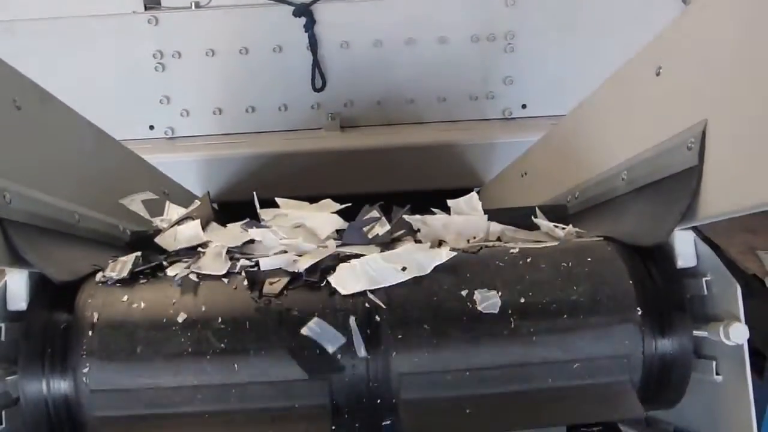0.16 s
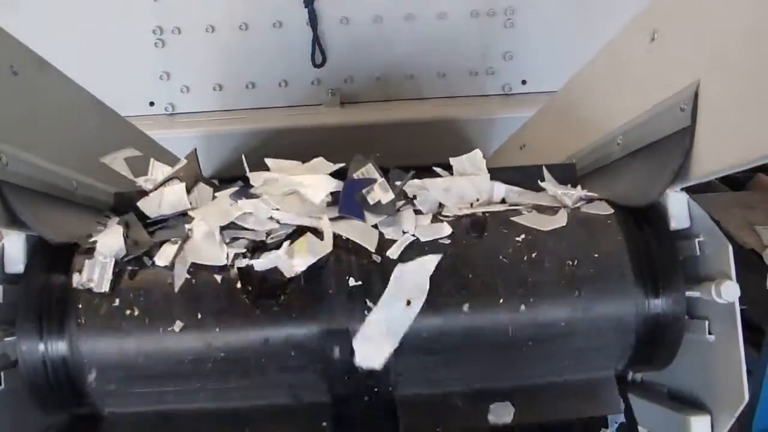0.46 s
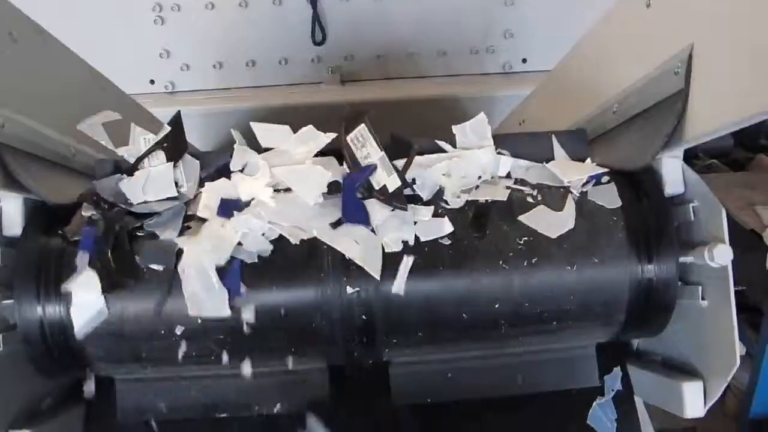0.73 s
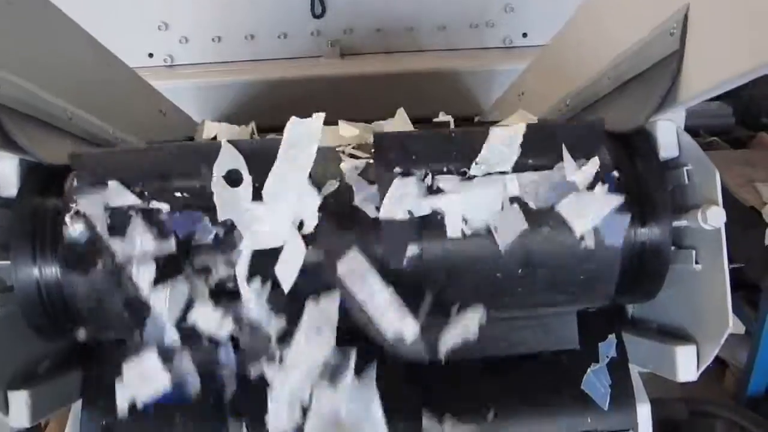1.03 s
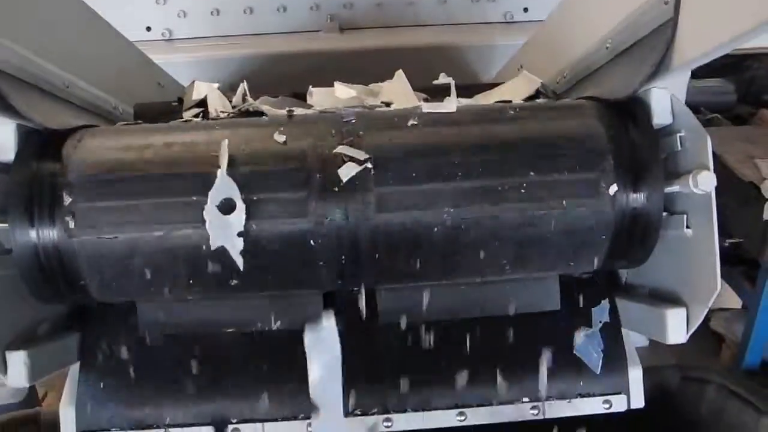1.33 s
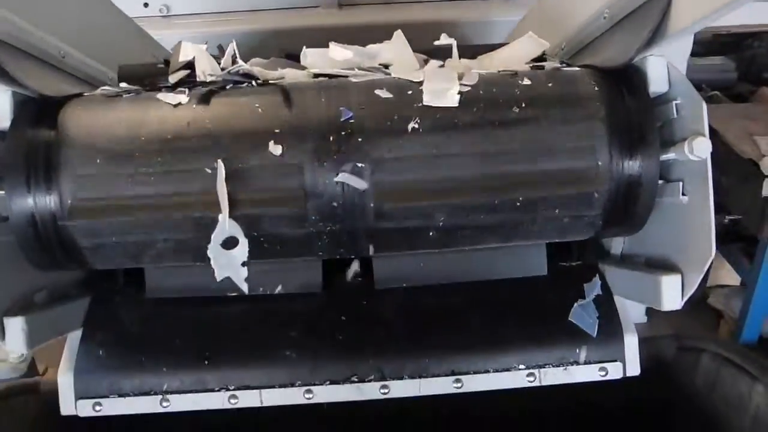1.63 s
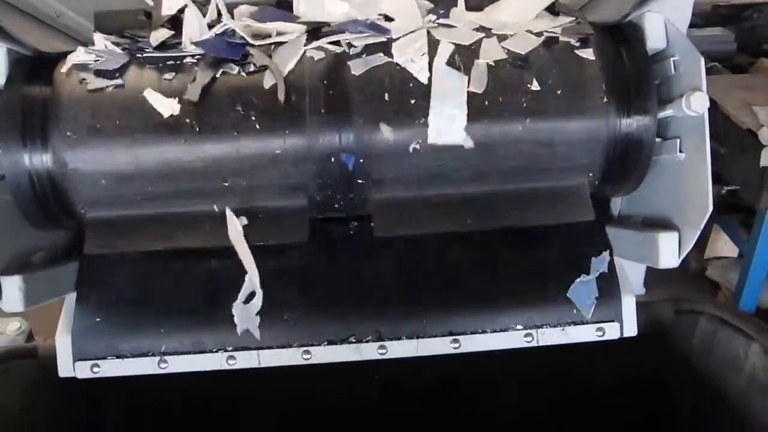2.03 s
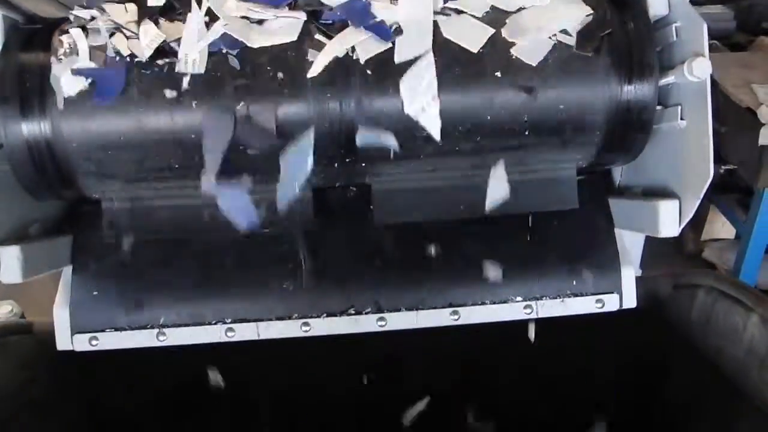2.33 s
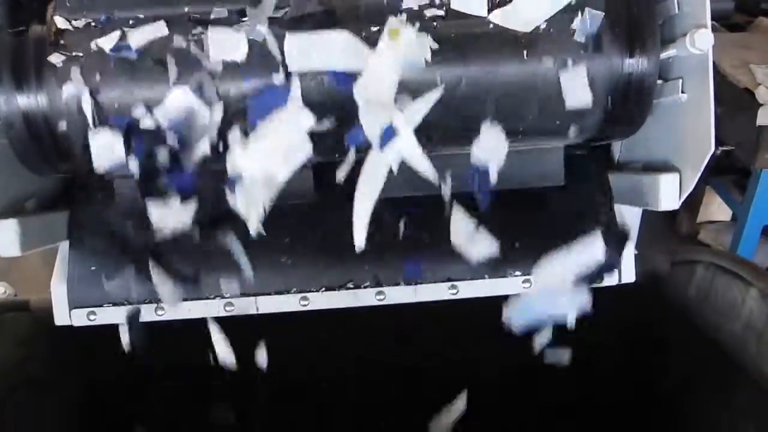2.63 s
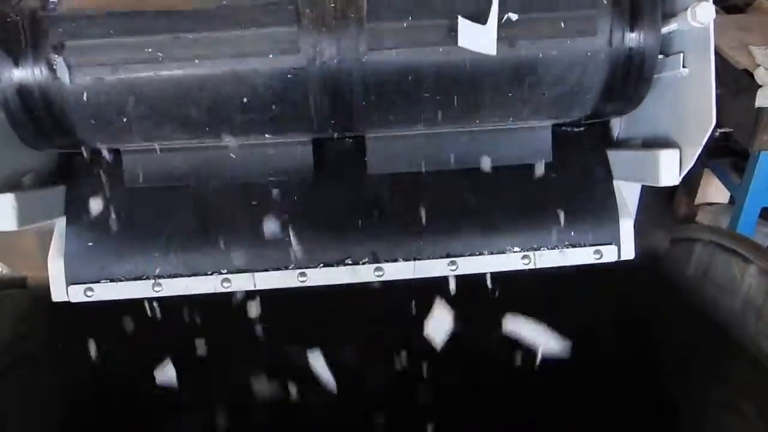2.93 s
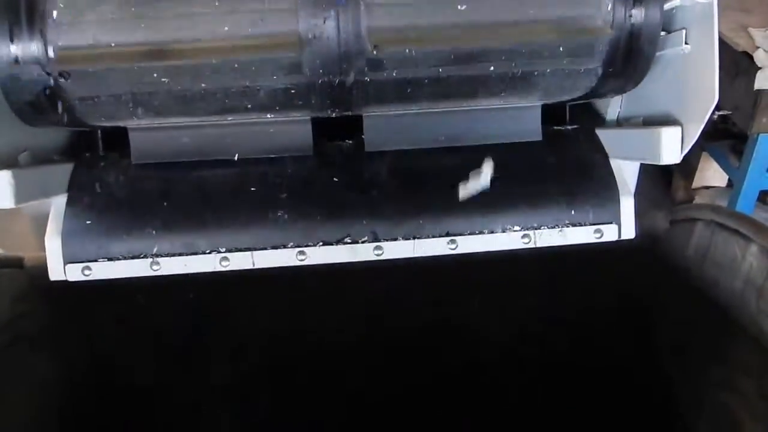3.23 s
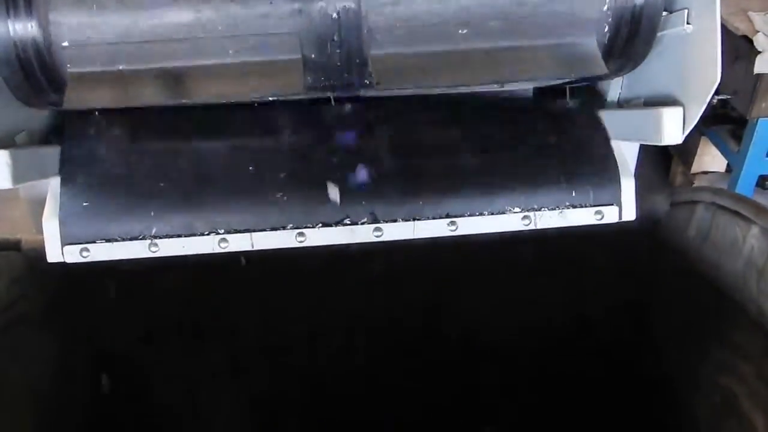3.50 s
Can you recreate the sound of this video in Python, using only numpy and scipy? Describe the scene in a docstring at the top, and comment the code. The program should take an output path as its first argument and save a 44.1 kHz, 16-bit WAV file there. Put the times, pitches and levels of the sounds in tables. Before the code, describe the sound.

Industrial shredder grinds hard plastic in a loud, dense, crackling rattle over a steady machine rumble

```python
"""In the steel hopper of an industrial shredder, hard plastic is ground: shards crack and rattle. Grinding and
ticks are dense random short rings, shaped by spectra and level curves; splinters and knocks (thick pieces and
the struck hopper panel) are bursts of tiny cracks, squeaks are noise in a sharp resonance. Sine lines and
filtered noise make the drive hum, rumble and slowly swell. One microphone with four notches hears it all."""
import sys
import numpy as np
from scipy import signal
from scipy.fft import rfft, irfft, next_fast_len
from scipy.io import wavfile
from scipy.ndimage import map_coordinates

SR = 44100
rng = np.random.default_rng(int(sys.argv[2]) if len(sys.argv) > 2 else 0)


def int16_out(signal):
    """Quantize to a 16-bit WAV file."""
    q = np.round(np.clip(np.atleast_2d(signal).T, -1, 1) * 32767)
    wavfile.write(sys.argv[1], SR, q.astype(np.int16))


N = 161406  # samples

# Level curves before trim, coarse pieces, small shards, finest chips: (time [s], level [dB])
COARSE_LEVEL = [(0, -28), (.1, -23.5), (.25, -27), (.42, -23.5), (.54, -28.5), (.88, -24), (1.12, -27),
                (1.35, -28), (1.69, -29), (1.79, -24.5), (1.92, -27), (1.99, -23), (2.42, -25.5),
                (2.52, -23.5), (2.68, -24.5), (2.77, -21.5), (2.98, -24.5), (3.15, -28), (3.3, -25),
                (3.5, -28.5), (3.66, -27.5)]
SMALL_LEVEL = [(0, -19.5), (.25, -28), (.3, -22.5), (.53, -26), (.9, -22.5), (1.1, -21.5), (1.34, -23),
               (1.42, -19.5), (1.58, -21.5), (1.71, -23.5), (1.8, -22), (1.92, -25.5), (2.04, -20.5),
               (2.27, -19.7), (2.42, -21.5), (2.52, -20.3), (2.68, -22), (3.0, -21), (3.16, -23),
               (3.26, -23), (3.66, -26)]
FINE_LEVEL = [(0, -47), (.25, -53), (.3, -46.5), (.53, -50.5), (.85, -46), (1.08, -45.5), (1.22, -39.5),
              (1.34, -49), (1.43, -44.5), (1.72, -48.5), (1.8, -45), (1.92, -50.5), (2.04, -40.5),
              (2.19, -37.5), (2.38, -46.5), (2.48, -42), (2.7, -46.5), (2.92, -48), (2.99, -43),
              (3.16, -47), (3.4, -50), (3.58, -47), (3.66, -50.5)]
# Relative spectra of the three sizes: (frequency [Hz], density [dB per Hz])
COARSE_TONE = [(25, -65), (120, -27.5), (300, -22), (550, -8), (690, -4), (900, -3.5), (1400, -2),
               (2000, 3), (2500, 3), (3300, -4), (5000, -3.5), (10000, -34.5)]
SMALL_TONE = [(500, -42), (1500, -15), (2300, -5), (3000, 1), (3600, -2.5), (4500, 1), (5400, -5),
              (6400, -2), (7300, -6), (8800, -12), (10700, -24.5), (13000, -34), (15500, -44)]
FINE_TONE = [(3000, -19), (6500, -4.5), (8800, 8), (10700, -4), (12700, -4.5), (14400, 0.5), (15600, -5)]
COARSE_TRIM_DB, SMALL_TRIM_DB, FINE_TRIM_DB = 3, 1.87, 9
# Relative spectrum of flakes ticking on the chute: (frequency [Hz], density [dB per Hz])
FLAKE_TONE = [(600, -27), (2000, -12), (4300, 6), (6500, -10), (9000, -5), (12000, -20), (15500, -17)]
TICK_TRIM_DB = -14

# Drive lines: (frequency [Hz], rms level at start [dB], rms level at end [dB]), before sway
HUM_LINES = [(91, -65, -65), (189, -61, -66), (300.5, -55.5, -56.5), (398, -63, -52), (668, -51, -49),
             (1992, -51, -46)]
HUM_WANDER_RAD, HUM_SWAY_DB = 0.8, 1.5
# Relative spectrum of running belt and gears: (frequency [Hz], density [dB per Hz])
BELT_GEAR_TONE = [(10, -55), (25, -35), (60, -40), (150, -23), (250, -11), (450, -10), (580, -17),
                  (700, -1), (1000, -8), (3000, 0.5), (12000, -45)]
RUMBLE_DB, RUMBLE_SWAY_DB = -30.5, 1.2
# Slow swells of low rumble from the belt, before trim: (time [s], level [dB])
SWELL_LEVEL = [(0, -62), (0.75, -59), (1.0, -51), (1.3, -55.5), (1.6, -68), (2.3, -57.5), (2.85, -55),
               (3.2, -70), (3.66, -58)]
# Relative spectrum of the swells: (frequency [Hz], density [dB per Hz])
LOW_SWELL_TONE = [(10, -28), (25, -6), (60, -13.5), (105, -5), (160, -8.5), (300, -15), (1000, -47)]
SWELL_TRIM_DB = -1

# Pieces splintering, before echo: (time [s], level [dB], length [s])
SPLINTER_EVENTS = [(.061, -27, 0.0067), (0.285, -26, 0.032), (0.893, -25, 0.022), (0.955, -19.5, 0.018),
                   (1.064, -15.5, 0.011), (1.091, -18.5, 0.011), (1.109, -20, 0.024), (1.276, -17, 0.0054),
                   (1.285, -17, 0.01), (1.381, -15.5, 0.014), (1.404, -23, 0.015), (1.433, -17, 0.0063),
                   (1.434, -19.5, .02), (1.476, -19.5, .016), (1.502, -16, 0.011), (1.542, -20.5, 0.027),
                   (1.574, -13, 0.01), (1.651, -21.5, 0.039), (2.235, -20.5, 0.045), (2.501, -19.5, 0.018),
                   (2.608, -19.5, 0.011), (2.699, -31, 0.011), (2.741, -20, 0.03), (2.887, -21, 0.024),
                   (2.959, -19, 0.03), (2.989, -14.5, 0.015), (3.055, -18.5, .012), (3.089, -22, 0.033),
                   (3.213, -23, 0.034)]
# Relative spectrum of a splinter: (frequency [Hz], density [dB per Hz])
BRITTLE_TONE = [(600, -27), (2000, -10), (3100, 0), (4200, 1), (5400, -1), (6600, 1), (8800, -11),
                (11000, -21), (15500, -26)]
CRACKS_PER_S, CRACK_SPREAD_DB, CRACK_DECAY_S, STRESS_RAMP_S = 2600, 3.5, .0007, .005
# Knocks, before echo: thick pieces crushed on the wall (rings near 1.2 and 2 kHz) and the struck hopper panel
# (rings near 700 Hz): (time [s], level [dB], length [s], ring [Hz])
KNOCK_EVENTS = [(0.077, -22.5, 0.038, 2000), (0.082, -27, 0.019, 1160), (1.719, -32, .04, 1150),
                (1.769, -25.5, 0.067, 1220), (1.966, -24, 0.082, 2000), (1.386, -29, 0.02, 730),
                (1.432, -27, 0.0058, 706), (1.509, -32.5, 0.064, 705), (1.637, -31, 0.0265, 715),
                (1.956, -32, 0.045, 740), (2.585, -30.5, 0.027, 710), (2.967, -24.5, 0.01, 730)]
KNOCK_Q = 5
# Pieces dragged over steel: (time [s], level before fade [dB], length [s], pitch [Hz])
SQUEAK_EVENTS = [(0.904, -36, .06, 4970), (1.067, -47, .16, 11270), (2.206, -18, .06, 2980),
                 (2.291, -23.5, 0.13, 4720), (2.44, -46, .08, 13800), (3.36, -52, .08, 10560),
                 (3.48, -40.5, 0.19, 9340)]
SQUEAK_Q = 130

# Decay of the steel walls: (frequency [Hz], time to fall 60 dB [s])
WALL_T60 = [(300, 0.73), (2000, 0.58), (6000, 0.48), (14000, 0.24)]
GRIND_ECHO_DB, BREAK_ECHO_DB = 0.5, -11
# Microphone notches: (centre [Hz], width [Hz], depth [0-1])
MIC_NOTCHES = [(2695, 640, 0.92), (4967, 490, 1), (5700, 400, 1), (7840, 760, 1)]
TOP_HZ = 15750


def amp(db):
    """Decibels to gain."""
    return 10 ** (np.asarray(db) / 20)


def unit(x):
    """Scale to rms 1."""
    return x / np.sqrt(np.mean(x ** 2) + 1e-20)


def along(points, hz):
    """Interpolate (Hz, value) points on a log frequency axis."""
    point_hz, values = np.transpose(points)
    return np.interp(np.log(hz + 1), np.log(point_hz + 1), values)


def curve(rows):
    """Interpolate (s, value) points, one value per sample."""
    return np.interp(np.arange(N) / SR, *np.transpose(rows))


def wobble(knots_per_s):
    """Smooth random curve through normally distributed knots."""
    position = np.arange(N) * knots_per_s / SR
    return map_coordinates(rng.standard_normal(1024), [position], mode="wrap")


def filtered(x, response):
    """Apply a complex frequency response."""
    m = next_fast_len(N + SR // 2)
    return irfft(rfft(x, m) * response(np.fft.rfftfreq(m, 1 / SR)), m)[:N]


def coloured(x, tone):
    """Minimum-phase filter with the given spectrum, unit energy."""
    size = 4096
    log_gain = np.log(amp(along(tone, np.fft.rfftfreq(size, 1 / SR))))
    cepstrum = irfft(log_gain)
    # fold the cepstrum: causal response
    cepstrum[1:size // 2] *= 2
    cepstrum[size // 2 + 1:] = 0
    h = irfft(np.exp(rfft(cepstrum)))
    return signal.fftconvolve(x, h / np.linalg.norm(h))[:N]


def add(out, start_s, x):
    """Mix x into out at start_s."""
    i = max(0, round(start_s * SR))
    out[i:i + len(x)] += x[:max(0, len(out) - i)]


def shards(low_hz, high_hz, ring_s, spread_db, count, size):
    """Random collisions; each shard is a decaying sine at its own pitch, cut at size samples."""
    when, pitch, life = rng.random((count, 3)).T[:, :, None]
    strength = amp(spread_db * np.clip(rng.standard_normal((count, 1)), -2, 2))
    k = np.arange(size)
    hz = low_hz + (high_hz - low_hz) * pitch
    decay = np.exp(-k / SR / (ring_s * (.5 + life)))
    rings = strength * decay * np.sin(2 * np.pi * hz * k / SR)
    # a lead-in of size samples is dropped, so rings are already under way at 0 s
    index = (when * (N + size)).astype(int) + k
    return np.bincount(index.ravel(), rings.ravel(), N + size)[size:N + size]


def hopper(x, wet_db):
    """Steel walls answer with decaying noise, a new tail per time slice; the end wraps to the start."""
    slices = np.array_split(np.arange(N), 64)
    noise = rng.standard_normal((len(slices), SR // 5))
    hz, t, z = signal.stft(noise, SR, nperseg=256)
    decay = amp(-60 * t / along(WALL_T60, hz)[:, None])
    tails = signal.istft(z * decay, SR, nperseg=256)[1]
    echo = np.zeros(2 * N)
    for part, tail in zip(slices, tails):
        reply = signal.fftconvolve(x[part], tail / np.linalg.norm(tail))
        add(echo, part[0] / SR + .002, reply)
    return x + amp(wet_db) * (echo[:N] + echo[N:])


def fracture(length_s):
    """Tiny random cracks under stress that builds and fades; energy of rms 1 over length_s."""
    t = np.arange(SR // 6) / SR
    chance = rng.random(len(t))
    strength, grit = rng.standard_normal((2, len(t)))
    knots_s = [0, min(STRESS_RAMP_S, length_s / 2), length_s, length_s + STRESS_RAMP_S]
    stress = np.interp(t, knots_s, [.5, 1, 0.34, 0.065])
    cracks = (chance < CRACKS_PER_S / SR) * stress
    cracks = cracks * amp(CRACK_SPREAD_DB * np.clip(strength, -2, 2))
    # power decays twice as fast as amplitude
    power = signal.lfilter([1], [1, -np.exp(-2 / (SR * CRACK_DECAY_S))], cracks ** 2)
    x = grit * np.sqrt(power)
    return x * np.sqrt(length_s * SR / (np.sum(x ** 2) + 1e-20))


def grinding():
    """Three sizes of plastic collide in the hopper; the cutters bite unevenly on all of them."""
    bite_db = .45 * wobble(32) + .4 * wobble(17)
    coarse = shards(150, 6000, ring_s=.0015, spread_db=3.5, count=11000, size=256)
    small = shards(800, 14000, ring_s=.0009, spread_db=4, count=20000, size=160)
    fine = shards(4000, 16000, ring_s=.0004, spread_db=3, count=30000, size=64)
    layers = [(coarse, COARSE_TONE, curve(COARSE_LEVEL) + COARSE_TRIM_DB + bite_db),
              (small, SMALL_TONE, curve(SMALL_LEVEL) + SMALL_TRIM_DB + bite_db),
              (fine, FINE_TONE, curve(FINE_LEVEL) + FINE_TRIM_DB + 2 * bite_db)]
    out = np.zeros(N)
    for x, tone, level_db in layers:
        out += unit(hopper(coloured(x, tone), GRIND_ECHO_DB)) * amp(level_db)
    return out


def ticks():
    """Stray flakes land on the chute near the microphone; level follows the small shards."""
    hits = shards(1500, 7000, ring_s=.00012, spread_db=7, count=190, size=48)
    return unit(coloured(hits, FLAKE_TONE)) * amp(curve(SMALL_LEVEL) + TICK_TRIM_DB)


def drive():
    """Motor and gear lines waver in level and phase over belt rumble and slow swells of low rumble."""
    t = np.arange(N) / SR
    hum = np.zeros(N)
    for hz, first_db, last_db in HUM_LINES:
        level_db = np.linspace(first_db, last_db, N) + HUM_SWAY_DB * wobble(5.86)
        phase = 2 * np.pi * hz * t + HUM_WANDER_RAD * wobble(9.7)
        hum += amp(level_db) * np.sqrt(2) * np.sin(phase)
    rumble = unit(coloured(rng.standard_normal(N), BELT_GEAR_TONE))
    rumble = rumble * amp(RUMBLE_DB + RUMBLE_SWAY_DB * wobble(9.7))
    swell = unit(coloured(rng.standard_normal(N), LOW_SWELL_TONE))
    swell = swell * amp(curve(SWELL_LEVEL) + SWELL_TRIM_DB)
    return hum + rumble + swell


def splinters():
    """Brittle pieces burst between the blades in runs of cracks."""
    out = np.zeros(N)
    for start_s, db, length_s in SPLINTER_EVENTS:
        add(out, start_s, amp(db) * fracture(length_s))
    return hopper(coloured(out, BRITTLE_TONE), BREAK_ECHO_DB)


def knocks():
    """Thick pieces break and the hopper panel is struck, each with a hollow ring: cracks excite a broad
    resonance."""
    out = np.zeros(N)
    for start_s, db, length_s, hz in KNOCK_EVENTS:
        ring = signal.lfilter(*signal.iirpeak(hz, KNOCK_Q, SR), fracture(length_s))
        ring = ring * np.sqrt(length_s * SR / np.sum(ring ** 2))
        add(out, start_s, amp(db) * ring)
    return hopper(out, BREAK_ECHO_DB)


def squeaks():
    """Stick and slip, as noise, excites one narrow mode of the piece; half-sine fade."""
    out = np.zeros(N)
    for start_s, db, length_s, hz in SQUEAK_EVENTS:
        t = np.arange(int(length_s * SR)) / SR
        noise = rng.standard_normal(SR // 2)
        # keep the end, where the resonance has built up
        ring = signal.lfilter(*signal.iirpeak(hz, SQUEAK_Q, SR), noise)[-len(t):]
        add(out, start_s, amp(db) * unit(ring) * np.sin(np.pi * t / length_s))
    return out


def scene():
    """The whole machine, the same in both channels."""
    mono = grinding() + ticks() + drive() + splinters() + knocks() + squeaks()
    return np.tile(mono, (2, 1))


def record(dry):
    """The microphone cuts four narrow notches and keeps nothing above its band limit."""
    def response(f):
        gain = (f < TOP_HZ).astype(complex)
        for hz, width_hz, depth in MIC_NOTCHES:
            damping = 1j * f * width_hz
            gain *= 1 - depth * damping / (hz * hz - f * f + damping)
        return gain
    return np.array([filtered(x, response) for x in dry])


dry = scene()
out = record(dry)
int16_out(out)
```